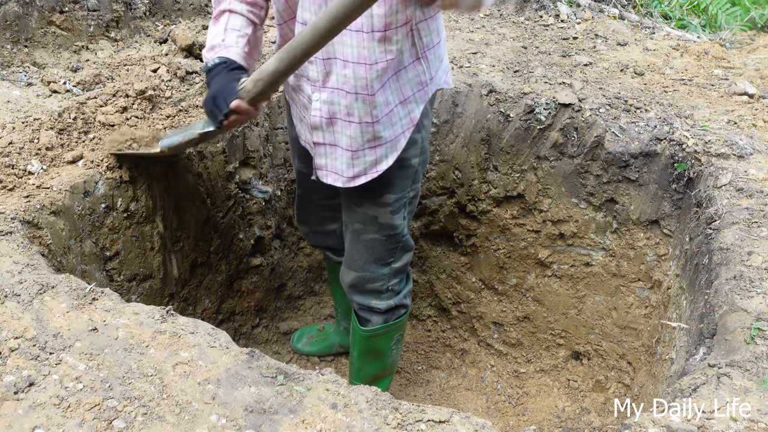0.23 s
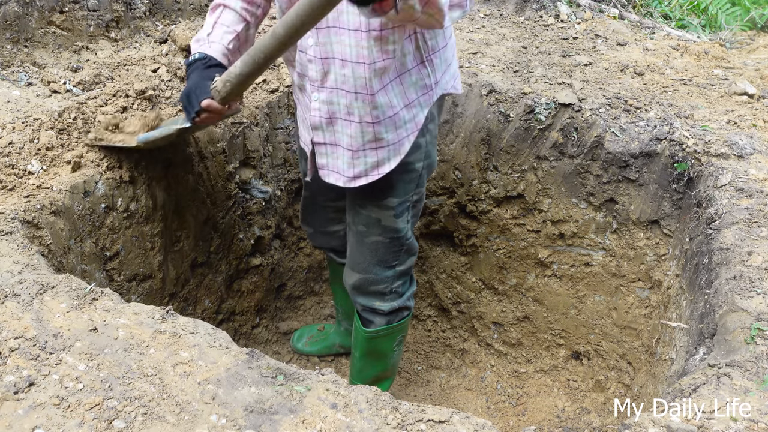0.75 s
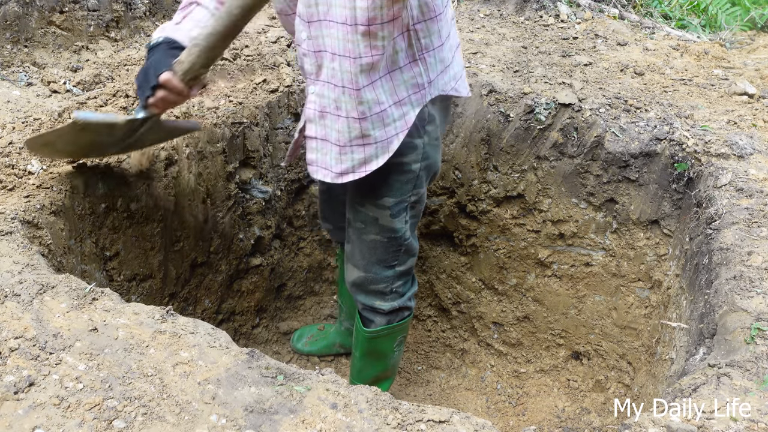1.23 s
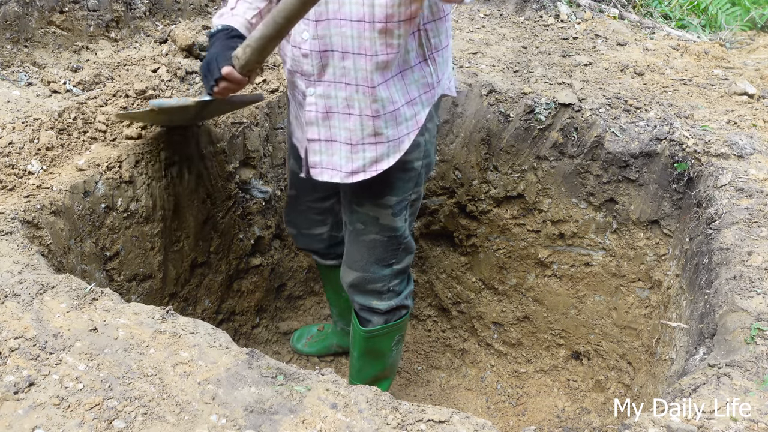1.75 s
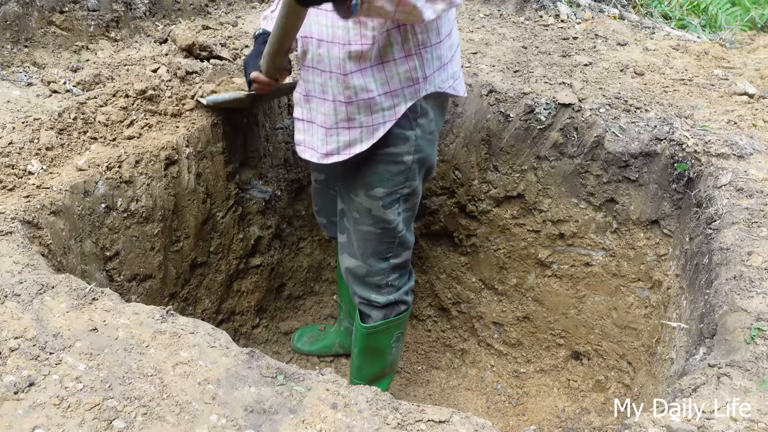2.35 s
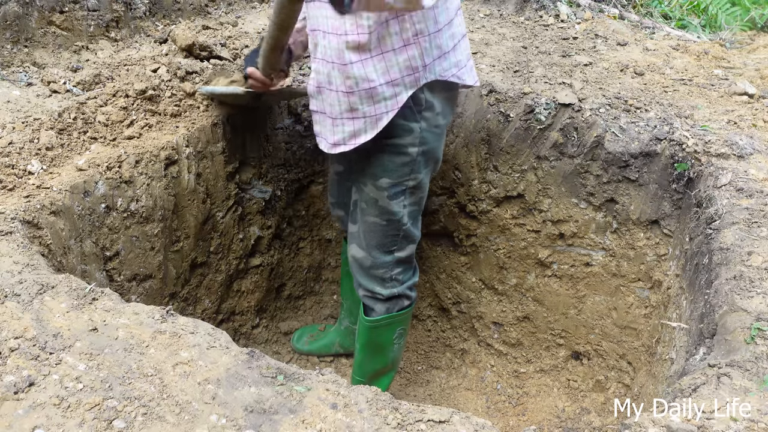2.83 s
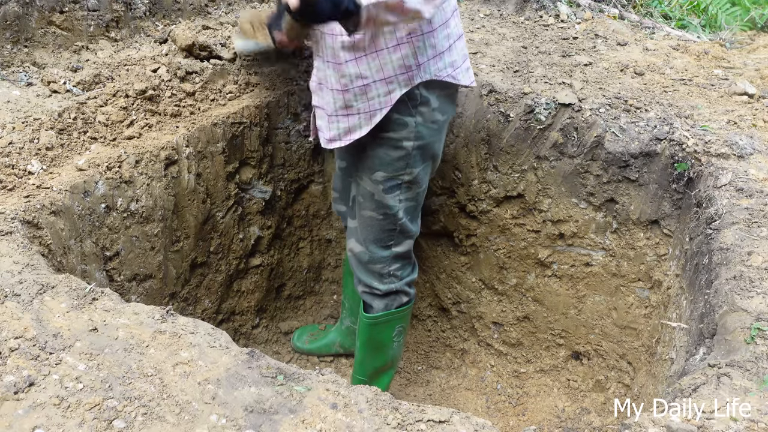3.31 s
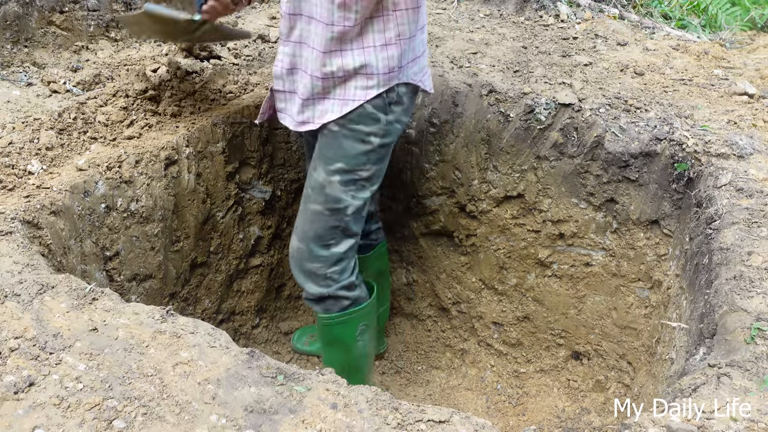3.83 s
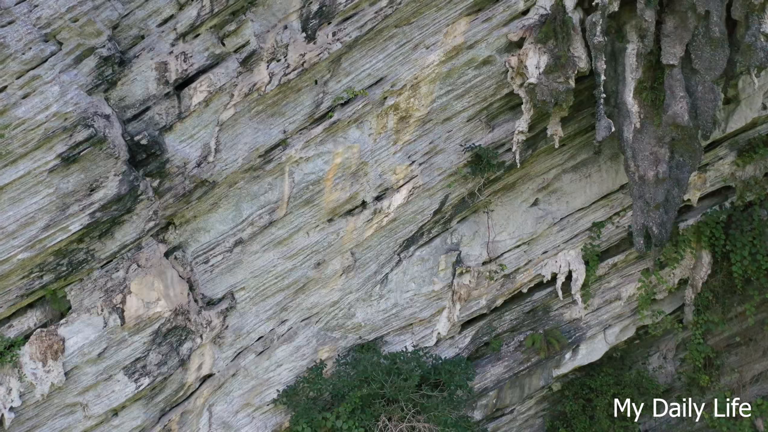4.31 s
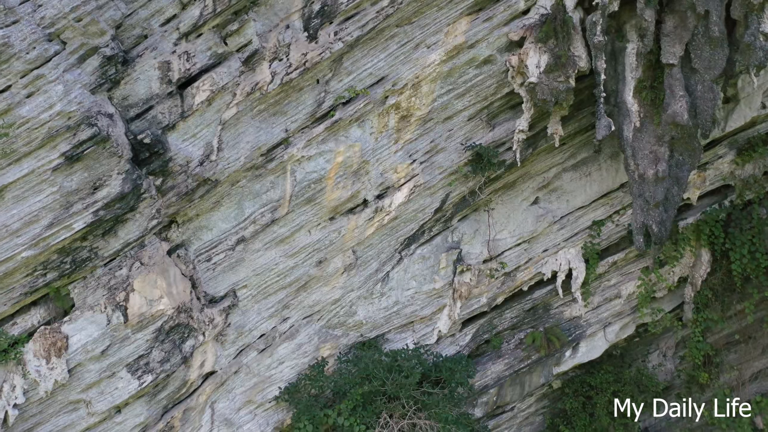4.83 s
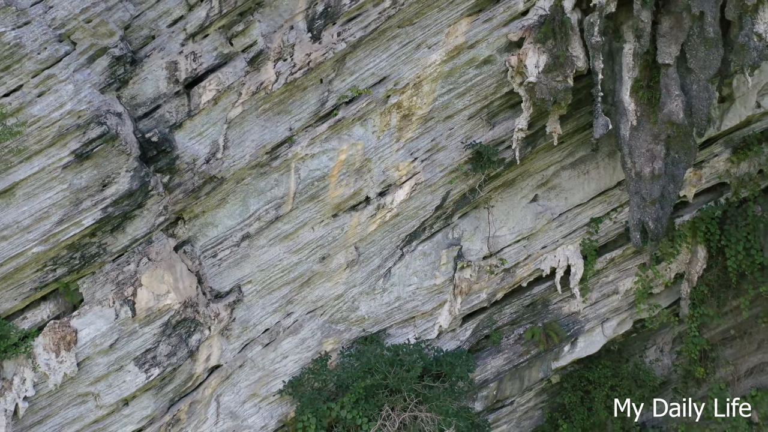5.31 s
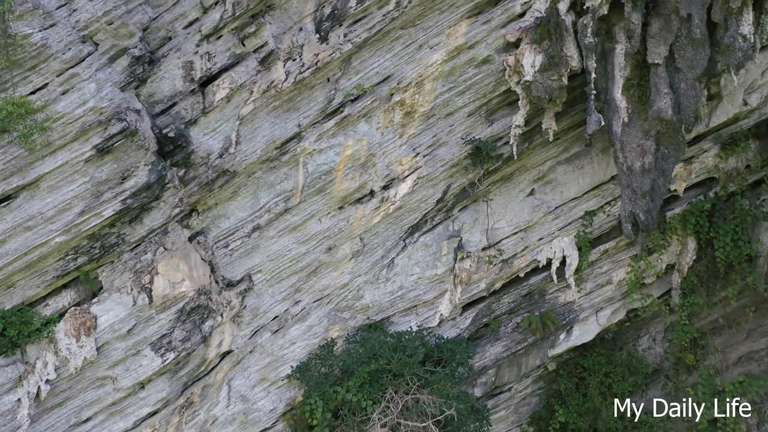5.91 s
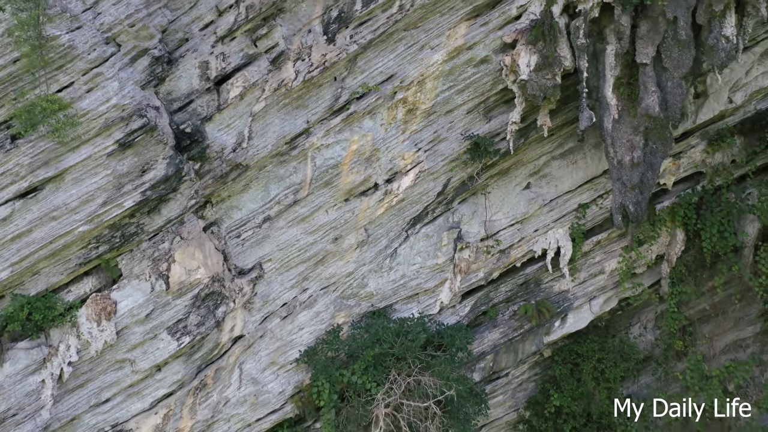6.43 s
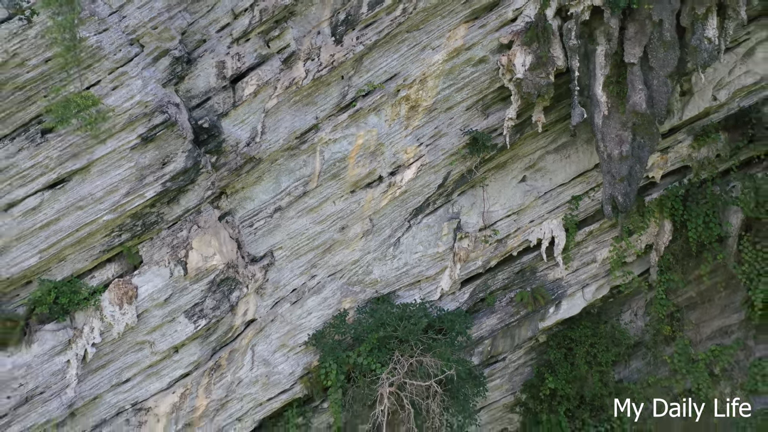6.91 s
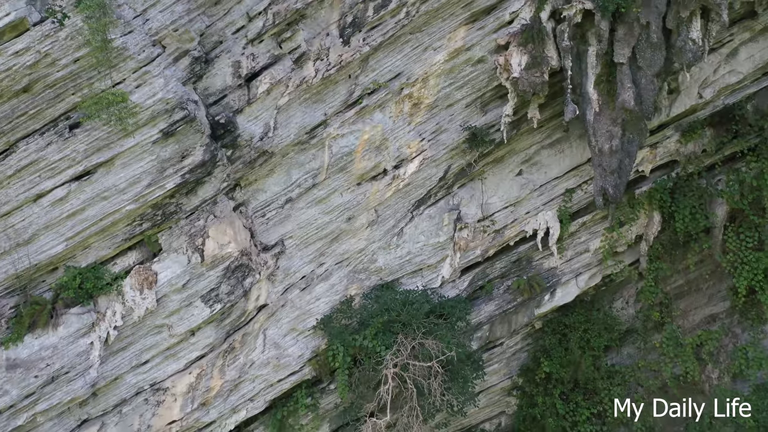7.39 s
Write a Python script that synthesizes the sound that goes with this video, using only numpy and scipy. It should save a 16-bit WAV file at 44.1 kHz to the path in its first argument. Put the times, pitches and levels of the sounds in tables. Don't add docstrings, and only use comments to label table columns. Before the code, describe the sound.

A close microphone catches a metal blade biting into gritty soil: two short scrapes, one long grinding scrape, a hard quick pair, then lighter rubs cleaning the blade. Pebbles click, steel rings shortly and lumps drop dully while high insects buzz all around. The sound then switches suddenly to calmer open air, with a fast high cricket trill, a fainter lower cricket to the left, distant rasps and small rising calls.

```python
import sys
import numpy as np
from scipy import signal
from scipy.fft import rfft, irfft, next_fast_len
from scipy.io import wavfile

SR = 44100
rng = np.random.default_rng(int(sys.argv[2]) if len(sys.argv) > 2 else 0)


def digitize_waveform(pressure):
    field = np.atleast_2d(pressure).T
    bounded = np.clip(field, -1, 1)
    quanta = np.round(bounded * 32767).astype(np.int16)
    wavfile.write(sys.argv[1], SR, quanta)


def boost(x):
    u = np.asarray(x, float) / 20
    return 10 ** u


N = 337806
T = np.arange(N) / SR
CUT_S = 4.063


def rms_one(x):
    return x / np.sqrt(np.mean(x ** 2) + 1e-20)


def in_time(rows):
    s, *columns = np.transpose(rows)
    return [np.interp(T, s, c) for c in columns]


def current_row(rows, lead_s=0):
    rows = np.array(rows)
    latest = np.searchsorted(rows[:, 0] - lead_s, T) - 1
    return rows[np.maximum(latest, 0)].T


def band(x, low_hz, high_hz, order=2):
    return signal.sosfilt(signal.butter(order, [low_hz, high_hz], "band", fs=SR, output="sos"), x)


def coloured(x, spectrum):
    size = next_fast_len(N)
    hz, level_db = np.transpose(spectrum)
    log_hz = np.log(np.fft.rfftfreq(size, 1 / SR) + 1)
    gain = boost(np.interp(log_hz, np.log(hz), level_db, left=-90))
    return rms_one(irfft(rfft(x, size) * gain, size)[..., :N])


def drift(rate):
    r = np.exp(-80 * np.pi * rate / SR)
    noise = rng.standard_normal(N // 40 + 2002)
    slow = signal.lfilter([1], [1, -2 * r, r * r], noise)[2000:]
    return np.interp(np.arange(N) / 40, np.arange(len(slow)), rms_one(slow))


def placed(x, pan_db):
    return x * boost(np.array([[pan_db / 2], [-pan_db / 2]]))


def wide(alike, pan_db):
    mid, side = rng.standard_normal((2, N))
    alike = np.clip(alike, 0, 1)
    both = np.sqrt((1 + alike) / 2) * mid
    apart = np.sqrt((1 - alike) / 2) * side * [[1], [-1]]
    return placed(both + apart, pan_db)


def tone(pitch_hz):
    return np.sin(2 * np.pi * np.cumsum(pitch_hz) / SR)


def bouts(rows, rise_s, fall_s, sag_db_per_s):
    out = np.zeros(N)
    for start_s, end_s, level_db in rows:
        at = slice(round(start_s * SR), round((end_s + fall_s) * SR))
        rise = np.clip((T[at] - start_s) / rise_s, 0, 1)
        fall = np.clip(1 + (end_s - T[at]) / fall_s, 0, 1)
        sag_db = sag_db_per_s * np.clip(T[at] - start_s - rise_s, 0, 1)
        out[at] += (rise * fall) ** 2 * boost(level_db - sag_db)
    return out


# (frequency [Hz], level [dB per Hz])
PIT_AIR = [(40, -36), (219, -18.5), (513, -25.5), (1500, -22), (1950, -23), (2200, -17), (3700, -12),
           (6260, -15), (7280, -6), (8670, -24), (9340, -22), (12500, -31.5), (15800, -24.5)]


def pit_air():
    return boost(-39.5 + drift(3.9)) * coloured(wide(0.58, 0.0), PIT_AIR)


# (frequency [Hz], level [dB per Hz])
CLIFF_AIR = [(40, -32), (90, -9), (200, 2), (550, 1), (900, -6), (1700, -2.5), (3000, -9), (6200, -9.5),
             (9800, -2.5), (10600, -18), (13000, -22), (14500, -14), (15800, -13)]


def cliff_air():
    return boost(-56 + 0.57 * drift(2.7)) * coloured(wide(0.59, 1.3), CLIFF_AIR)


# (low edge [Hz], high edge [Hz], level [dB], pulse rate [per s],
# pulse depth [0-1], left-right lean [dB], likeness of the ears [0-1])
PIT_CHORUS = [
    (7020, 7690, -36.5, 36, 0.07, -8.5, 1),
    (7970, 8400, -44, 200, 0, -5, 0.94),
    (8310, 8720, -46, 58, 0.4, 0.5, 0.9),
    (4540, 6400, -47, 340, 1, -8, 1),
]
CLIFF_CHORUS = [
    (6690, 7500, -49, 110, 0.099, -3, 1),
    (7550, 7880, -54.5, 50, 0.15, -1, 0.61),
    (5170, 5800, -58.5, 96, 0.3, -1, 0.62),
    (3980, 5650, -55.5, 300, 0.059, 4, 0.84),
    (8670, 9420, -60.5, 160, 0.12, -1, 0.75),
]


def chorus(table, heard):
    out = np.zeros((2, N))
    for low_hz, high_hz, level_db, per_s, depth, pan_db, alike in table:
        phase = 2 * np.pi * np.cumsum(per_s * (1 + 0.0395 * drift(3.96)[heard])) / SR
        pulses = (1 + np.clip(depth, 0, 1) * np.cos(phase)) ** 2 * boost(drift(2.4)[heard])
        wings = band(wide(alike, pan_db)[:, heard] * pulses, low_hz, high_hz, order=3)
        out[:, heard] += boost(level_db) * rms_one(wings)
    return out


# (start [s], end [s], pitch [Hz], level [dB])
WHINES = [(0.042, 0.232, 3650, -36), (0.627, .72, 3700, -37), (0.903, 1.338, 3607, -36.5),
          (.98, 1.144, 5500, -35.5), (1.699, 2.06, 5170, -39), (1.791, 2.013, 3760, -37),
          (2.358, 2.665, 5070, -36.5), (2.359, 2.672, 5260, -35.5), (2.4, 2.617, 5570, -38),
          (2.95, 3.496, 5560, -38), (3.194, 3.75, 5080, -39), (3.293, 3.499, 4400, -58),
          (3.302, 3.603, 2880, -44.5), (3.44, 3.693, 3830, -41)]


def whines():
    out = np.zeros(N)
    swell_db = 1.6 * drift(9) + 2.6 * drift(70) - .5
    waver_hz = 14 * drift(40)
    for start_s, end_s, hz, level_db in WHINES:
        at = np.arange(round(start_s * SR), round(end_s * SR))
        own = (at + round(hz * 50)) % N
        fade = np.clip(np.minimum(T[at] - start_s + 0.0081, end_s - T[at]) / 0.015, 0, 1)
        out[at] += fade * boost(level_db - 8.0 + swell_db[own]) * tone(hz + waver_hz[own])
    return placed(out, -3.0)


# (start [s], end [s], level [dB], first pitch [Hz])
TRILL = [(4.062, 4.117, -50, 3350), (4.115, 4.15, -61, 3210), (4.16, 4.19, -65, 3200),
         (4.29, 4.32, -63, 3250), (4.38, 4.42, -65, 3330), (5.4, 5.44, -52, 3350), (5.44, 5.49, -52, 3320),
         (5.495, 5.55, -62, 3290), (5.574, 5.627, -49.5, 3370), (5.635, 5.665, -57, 3280),
         (5.68, 5.71, -63, 3340), (5.72, 5.78, -61, 3340), (5.8, 5.843, -63, 3350)]


def far_trill():
    strength = bouts(np.array(TRILL)[:, :-1], rise_s=0.02, fall_s=0.075, sag_db_per_s=110.0)
    start_s, end_s, level_db, first_hz = current_row(TRILL)
    pitch = first_hz - 1300 * np.clip(T - start_s, 0, .1)
    return placed(strength * boost(2.8 * drift(110) - 2) * tone(pitch + 40 * drift(90)), 7.6)


# (pitch [Hz], pulse rate [per s], left-right lean [dB], lateness [throbs])
SHIMMER_WINGS = [
    (5330, 110, -3, .45),
    (5480, 100, 6, 0.1),
    (5630, 86, 6, 0.0),
]


def mid_singers():
    depth, peak_s, period_s = 0.85, 4.19, .1344
    shimmer = 0
    for hz, per_s, pan_db, late in SHIMMER_WINGS:
        pulses = (1 + np.cos(2 * np.pi * np.cumsum(per_s + 2.7 * drift(3.23)) / SR)) ** 0.87
        throb = 1 + depth * np.cos(2 * np.pi * ((T - peak_s) / period_s - late))
        song = throb * pulses * boost(1.2 * drift(5.9)) * tone(hz + 60 * drift(40.3))
        shimmer = shimmer + placed(song, pan_db)
    return rms_one(shimmer) * boost(-53.5)


# (start [s], end [s], level [dB])
RASP = [
    (4.53, 4.9, -60),
    (4.95, 5.3, -59.5),
    (5.36, 5.8, -61.5),
    (6.33, 6.4, -70),
    (6.62, 6.95, -63),
    (7.05, 7.17, -65),
]


def rasp():
    scratches = (1 + .4 * np.cos(2 * np.pi * np.cumsum(84 + 6 * drift(8)) / SR)) * boost(drift(30))
    dry_noise = rms_one(band(wide(.85, 0.0) * scratches, 9300, 12800))
    return dry_noise * bouts(RASP, rise_s=0.072, fall_s=0.33, sag_db_per_s=20.0)


# (start [s], end [s], level [dB])
GLIDES = [
    (6.383, 6.45, -54),
    (6.685, 6.75, -52),
    (6.93, 7.0, -52),
    (7.14, 7.21, -50),
    (7.34, 7.42, -50),
    (7.54, 7.61, -49),
]


def glides():
    since = np.clip(T - current_row(GLIDES)[0], 0, .08)
    call = tone(4520 + 4000 * since + 190 * drift(200))
    return bouts(GLIDES, rise_s=.02, fall_s=.02, sag_db_per_s=0) * boost(-4 + 3.5 * drift(70)) * call


def wing_note(t, hz, arch_hz, fall_hz, length_s, rough_db):
    u = np.clip(2 * t / length_s, -1, 1)
    pitch = hz - arch_hz * u ** 2 - fall_hz * u + 15 * rough_db * drift(80.5)
    return (1 - u ** 6) * boost(rough_db * drift(220)) * tone(pitch)


# (time [s], level [dB])
HIGH_CRICKET = [
    (4.07, -46.5),
    (4.6, -47.5),
    (5.1, -46),
    (5.4, -47.5),
    (5.7, -45.5),
    (6.0, -47),
    (6.4, -45.5),
    (7.2, -47.5),
]


def high_cricket():
    first_s, period_s, last_s = 4.1017, .044124, 7.30
    since = (T - first_s + period_s / 2) % period_s - period_s / 2
    tiring_db = -9 * (T > last_s) - 40 * (T > last_s + .09)
    level_db = in_time(HIGH_CRICKET)[0] + 10.5 - 85 * since + tiring_db
    high = wing_note(since - .001, 7270, 260, 30.0, .017, rough_db=0.8) * boost(level_db)
    return placed(np.array([high, np.roll(high, 1)]), -3)


# (time [s], level [dB])
LOW_CRICKET = [
    (4.07, -58.5),
    (4.57, -56.5),
    (4.63, -76),
    (4.78, -70),
    (4.81, -57),
    (5.3, -57.5),
    (7.66, -56.5),
]
# (start [s], period [s])
LOW_PHRASES = [
    (3.952, .0445),
    (4.835, .072),
    (5.045, .06),
    (5.225, .0445),
    (5.581, .04305),
    (6.442, .0436),
]


def low_cricket():
    start_s, period_s = current_row(LOW_PHRASES, lead_s=.02)
    since = (T - start_s + period_s / 2) % period_s - period_s / 2
    flat_hz = 6000 * (period_s - period_s.min())
    second = wing_note(since - .003, 4185 - flat_hz, 55, 270, 0.014, rough_db=1.7)
    first = wing_note(since + 0.01, 4175 - flat_hz, 60, 230, .011, rough_db=3.0)
    chirps = second + boost(-2.0) * first
    return placed(chirps * boost(in_time(LOW_CRICKET)[0] + 1.5), 18.3)


# (time [s], peak level [dB], pitch [Hz])
CLODS = [(1.368, -28.5, 520), (1.432, -26.5, 804), (1.47, -25.5, 700), (1.57, -17, 856), (2.516, -41, 495),
         (2.568, -28, 456), (2.594, -36, 560), (2.62, -45, 450), (2.645, -39, 420), (2.66, -40, 484),
         (2.935, -37, 350), (3.212, -28, 1000), (3.222, -26, 1100), (3.236, -22, 706), (3.868, -44.5, 250),
         (6.728, -51, 520)]


def clods():
    out, t = np.zeros(N), np.arange(int(.08 * SR)) / SR
    for s, peak_db, hz in CLODS:
        crumble = rng.standard_normal(len(t)) * boost(-60 * t / 0.062)
        impact = 14 * (t == 0)
        burst = band(crumble + impact, hz / 1.8, hz * 1.6)
        out[round(s * SR):][:len(t)] += boost(peak_db + 0.5) * burst / np.abs(burst).max()
    return out


def ground_echo(x):
    dull = band(x + 1e-18, 150, 21000, order=1) * boost(-12.5)
    out = np.array([x, x])
    for ear, lag_s, level_db in [(0, 0.00272, -65), (0, 0.0051, -9.0), (0, .0093, -0.5), (0, 0.011, -14)]:
        lag = round(lag_s * SR)
        out[ear, lag:] += boost(level_db) * dull[:N - lag]
    return out


def grit(per_s, spread_db):
    sizes = boost(spread_db * np.minimum(rng.exponential(1, N), 5)) * rng.choice([-1, 1], N)
    return rms_one(sizes * (rng.random(N) < per_s / SR))


def resonance(x, hz, width_hz):
    r, w = np.exp(-np.pi * width_hz / SR), 2 * np.pi * hz / SR
    return signal.lfilter([0, 2 * np.sqrt(1 - r) * np.sin(w)], [1, -2 * r * np.cos(w), r * r], x)


# (deepest point [s], sinking [ms], freeing [ms], rub level [dB], weight [dB])
STROKES = [
    (-.1, 100, 123, -20, -13),
    (0.319, 25, 120, -16, 0.5),
    (0.819, 93.6, 200, -18.5, -0.5),
    (1.6, 236, 74, -17, -5.5),
    (2.179, 54.5, 97, -15.5, -5.5),
    (2.299, 33, 146, -19.5, 0),
    (2.861, 140, 190, -28, -3),
    (2.939, 42, 140, -23, 1.5),
    (3.18, 180, 115, -28, 1),
]


def strokes():
    levels = []
    for deepest_s, sink_ms, free_ms, rub_db, weight_db in STROKES:
        sink_s, free_s = sink_ms / 1000, free_ms / 1000
        moments = deepest_s + np.array([-sink_s - .025, -sink_s, 0, free_s, free_s + 1])
        trickle_db = rub_db - 16
        levels.append(np.interp(T, moments, [-75, rub_db - 6.5, rub_db, trickle_db, trickle_db - 34]))
    levels = np.array(levels)
    return levels.max(axis=0), np.array(STROKES)[levels.argmax(axis=0), -1]


# (time
# [s], peak level [dB], dull share [dB], bright share [dB], blade pitch [Hz])
CATCHES = [(0.2782, -17, -29, 1, 3260), (0.2997, -5.5, -15, -5, 3340), (0.3182, -12.5, -5, -19, 4390.0),
           (0.3384, -6.5, -11.5, -7, 3790), (0.3648, -11, -10, -9, 3310), (0.3815, -17, -18, -9.0, 3030),
           (0.3915, -16, -17, -5, 3370.0), (0.4024, -17, -8, -11.0, 3980.0), (0.7324, -32, -10.0, -9, 3500),
           (0.743, -19, -3, -17, 2820), (0.7727, -12, -9, -15, 3740), (0.7869, -4, -3, -10, 3840),
           (0.8073, -7.5, -10, -18, 3090), (0.8264, -9.5, -5, -21, 2950),
           (0.8562, -24, -10.0, -7.0, 3940.0), (0.8651, -18.5, -5, 2.5, 6040), (0.8879, -15, -6, -5, 3200),
           (1.3632, -13, -8, 0, 4200), (1.3947, -12.5, -13.0, -4, 4430),
                (1.4245, -5.5, -10.5, -2, 3580), (1.4354, -6, -4, -11.0, 4200), (1.471, -14, -4, 0, 2140),
                (1.4833, -15, -9, -12, 3780), (1.4884, -14, -8, -10.0, 1950), (1.5252, -12, -19, 0, 3780.0),
                (1.5444, -16, -15, 7, 4120.0), (1.5588, -9.5, -1, 3.5, 3920.0),
                (1.5684, -7.5, -3, -1.5, 1970.0), (1.599, -6.5, -5, -10, 4400),
                (1.615, -9.5, -5, -2.5, 4270), (2.125, -17, -21, 7.5, 3860),
                (2.1365, -10.5, -18, 4.5, 2560.0), (2.151, -10.5, -6.0, -8, 2080),
                (2.16, -8.5, -2, -5.0, 5100), (2.1843, -9.5, -5, -6, 4200), (2.227, -8.5, -11, -23, 3110),
                (2.256, -20.0, -10, -4, 3870), (2.272, -17, -9, 3, 3730), (2.29, -10.5, -7, -2, 2210),
                (2.3007, -11, -8, -11.0, 3090.0), (2.3277, -22, -20, -4, 5050)]
KNOCKS = [(0.0168, -24, -26, -18, 3880), (0.2419, -23.5, -16, -5, 2210), (0.4998, -19, -17, -18, 4150),
          (0.5173, -20, -18, -15.0, 3340), (0.9355, -24.5, 6.5, -15.0, 3040), (1.1027, -27, -7, 5.5, 3620),
          (1.1584, -45, -15, -9.0, 3700), (1.6725, -29, -6.0, -9.0, 2090.0), (1.7019, -26, -1, -13.0, 3050),
          (1.8177, -22, -13, 1, 2170), (2.0604, -21.5, -33, -4, 2790.0),
          (2.3568, -24, -13.0, -13.0, 3900.0), (2.3703, -18, -11.0, -6, 3270),
          (2.3779, -20.0, -9, -5, 2260), (2.396, -23, -8, -1, 2530), (2.4278, -27, -13.0, -14.0, 4960),
          (2.4973, -31, -2, -16, 5170), (2.5633, -30, -16, -13.0, 3850), (2.589, -31, 1, -12.0, 1900),
          (2.6896, -20, -2, 3, 3200), (2.701, -20, -8, -11.0, 5370), (2.736, -21.5, -11, 1, 4100),
            (2.7489, -31, -13, -8.0, 3200), (2.7705, -13.5, -9, 4.5, 5970), (2.797, -15.5, -15, 3, 5520),
            (2.83, -11.5, -6, 2.5, 5600), (2.8453, -19, -4.0, 0, 2150), (2.87, -17, -4, -2, 5470.0),
            (2.9279, -5.5, -8, -15, 4440), (2.9383, -14.5, -8, -10.0, 2120), (2.9519, -9, -10, -5, 4070),
            (2.9886, -18.5, -6, -13.0, 3070), (3.0264, -34, -16, -10.0, 5580.0),
            (3.0331, -33, -14.0, -10.0, 5560), (3.049, -21.5, -11, -10.0, 4410.0),
            (3.0693, -21, -5, -2, 3030), (3.1083, -34, -11.0, -6, 4400), (3.1335, -23, -10, -11.0, 4380),
            (3.1463, -21, -2, 1, 2980), (3.1782, -28, 3, -9.0, 5040.0), (3.218, -13.5, 0, -7, 3580),
            (3.231, -29, 5, -9.0, 2190), (3.2424, -40, -6, -12.0, 2190.0), (3.264, -38, -13, -10.0, 5010.0),
            (3.275, -21, -5, -11.0, 2570), (3.2875, -18, -9, -21, 3070)]


def jolts(grains):
    body, dull, bright, notes = np.zeros((4, N))
    t = np.arange(int(.15 * SR)) / SR
    for rows, t60 in [(CATCHES, 0.056), (KNOCKS, 0.048)]:
        for s, peak_db, dull_db, bright_db, hz in rows:
            at = slice(round(s * SR), round(s * SR) + len(t))
            rise_s = .0002 * max(-peak_db - 5, 2)
            tail = boost(peak_db - 60 * t / t60)
            tick = boost(peak_db - 16.0 - 60 * t / 0.0019)
            shape = (tail + tick) * np.minimum(t / rise_s, 1)
            body[at] += shape
            dull[at] += boost(peak_db + dull_db - 60 * t / t60 / 1.53) * np.minimum(t / 0.0032, 1)
            bright[at] += shape * boost(bright_db)
            ring_db = -15.5 + (0.74 - 1) * (peak_db - 2.5)
            notes[at] += boost(ring_db) * resonance(grains[at] * shape, hz, 150)
    return body, dull, bright, notes


# (time [s], peak level [dB])
TICKS = [(.3013, -6), (.3181, -8), (.344, -9), (.3685, -12), (.787, -9), (.809, -6), (1.3635, -13),
         (1.3955, -15), (1.4254, -6), (1.4275, -7), (1.438, -7), (1.5247, -3.5), (1.5695, -5), (1.6005, -6),
         (2.0615, -20), (2.128, -11), (2.138, -5), (2.1705, -6), (2.186, -8), (2.2266, -5), (2.2925, -11),
         (2.7677, -18), (2.772, -15), (2.83, -14), (2.9296, -4), (2.934, -10), (3.05, -24), (3.2205, -17),
         (3.2885, -16)]


def ticks():
    clicks, t = np.full(N, 1e-18), np.arange(round(.03 * SR)) / SR
    for s, peak_db in TICKS:
        force_db = peak_db + 10
        spray = boost(force_db - 16 - 60 * t / .03) * rng.standard_normal(len(t))
        clicks[round(s * SR):][:len(t)] += spray
        clicks[round(s * SR)] += boost(force_db)
    return band(clicks, 2450, 8000)


# (time [s], pitch [Hz], peak level [dB], fall by 60 dB [s])
RINGS = [(.3, 908, -31, 0.08), (.345, 1420, -21.5, 0.17), (.362, 1417, -26.5, .2),
         (.405, 1134, -22.5, 0.077), (.75, 1400, -35, 0.36), (.8, 1130, -28, .12), (.885, 1123, -29, 0.11),
         (.9, 1435, -33, 0.26), (1.01, 1438, -45.5, 0.55), (1.055, 1146, -36, 0.061),
         (1.365, 1110, -24.5, 0.16), (1.43, 1052, -22.5, 0.16), (1.445, 2090, -18.5, 0.11),
         (1.485, 1945, -28, 0.24), (1.572, 2000, -13.5, 0.052), (1.6, 1380, -30, 0.057),
         (1.606, 1330, -33, 0.58), (2.159, 920, -37, 0.12), (2.295, 902, -24, 0.17),
         (2.695, 890, -38, 0.11), (2.8, 1350, -32, 0.11), (2.832, 1380, -27, 0.13),
         (2.865, 915, -33.5, 0.24), (2.951, 1343, -35, 0.24), (3.291, 1420, -25.5, 0.078)]


def rings():
    out, t = np.zeros(N), np.arange(round(.5 * SR)) / SR
    for s, hz, peak_db, t60 in RINGS:
        swell = np.minimum(t / 0.0062, 1)
        out[round(s * SR):][:len(t)] += boost(peak_db - 60 * t / t60) * swell * np.sin(2 * np.pi * hz * t)
    return out * boost(5 * drift(110) - 3)


DIGGING = slice(0, N // 2)
DULL_BELOW_HZ = 2200
# (frequency [Hz], level [dB per Hz])
CLAY = [(410, -40), (700, -70), (897, -14.5), (1400, -7), (1530, -3), (2180, -2), (2380, -3), (3020, 3),
        (4700, 1), (8670, -7.5), (15800, -27.5)]
CRUNCH_EDGES_HZ = [420, 700, 1100, 1600, 2200, 3000, 4000, 5200, 6800, 8800, 11000]


def crunch(force, dull_force):
    out, share = np.zeros(N), .75
    crackle = share * grit(1800, spread_db=3.0)
    clay = []
    for _ in range(2):
        own = (1 - share ** 2) ** .5 * grit(5000, spread_db=2.5)
        clay.append(coloured(crackle + own, CLAY)[DIGGING])
    for k, (low_hz, high_hz) in enumerate(zip(CRUNCH_EDGES_HZ, CRUNCH_EDGES_HZ[1:])):
        drive = dull_force if low_hz < DULL_BELOW_HZ else force
        patchy = drive * boost(drift(46) - 2.0)
        out[DIGGING] += band(clay[k % 2], low_hz, high_hz) * patchy[DIGGING]
    return out


# (pitch [Hz], width [Hz], level [dB])
BLADE = [(930, 6.8, -11), (1140, 8.5, -8), (1316, 4.3, -5.5), (1420, 3.1, -2.5), (1937, 20, -4.5),
         (2135, 18, -0.5), (2283, 37, -3.5), (2560, 21, -4), (2672, 40, -3), (3090, 24, -1),
         (3310, 18, -6.5), (3808, 21, 0), (4110, 42, -3), (4420, 12, -3.5), (4900, 13, -5.5),
         (6300, 55, -34)]


def blade_modes(force, dull_force):
    out, grains = np.zeros(N), grit(4000, spread_db=2.0)
    for hz, width_hz, level_db in BLADE:
        low = hz < DULL_BELOW_HZ
        drive = grains * (dull_force * boost(-6.5) if low else force) * boost(3.42 * drift(25))
        out[DIGGING] += boost(level_db - 16) * resonance(drive[DIGGING], hz, width_hz + 10 + 16 * low)
    return out


# (frequency [Hz], level [dB per Hz])
PUSH = [(76, -51), (130, -3), (257, 16), (335, 6.5), (591, -13), (900, -18), (1170, -22), (1980, -120)]


def shovel():
    rub_db, weight_db = strokes()
    fine_db = -27 + 1.29 * (rub_db + 21.0)
    push_db = -43 + 1.8 * (rub_db + 19.5) + weight_db
    thump_db = -57 + (rub_db + 21.0) + weight_db
    body, dull, bright, notes = jolts(grit(9000, spread_db=5.0))
    clumps_db = 2.8 * drift(90)
    force = np.hypot(boost(rub_db - 3.0 + clumps_db), boost(-4.0) * body)
    dull_force = np.hypot(boost(rub_db - 5 + clumps_db), boost(3.0) * dull)
    blade = crunch(force, dull_force) + blade_modes(force, dull_force)
    dust = rms_one(band(coloured(grit(16000, spread_db=4.0), CLAY), 8740, 16000))
    fine = dust * np.hypot(boost(fine_db - 2.5 + clumps_db), boost(-8.0) * bright)
    push = coloured(rng.standard_normal(N), PUSH) * boost(push_db - 1.5)
    thump = rms_one(band(rng.standard_normal(N), 82, 127)) * boost(thump_db - 1.0)
    edge = band(blade + fine, 500, 18000)
    return edge + push + thump + notes + ticks() + rings()


def scene():
    digging = ground_echo(shovel() * (T < 3.45) + clods())
    pit = pit_air() + chorus(PIT_CHORUS, slice(0, round(4.1 * SR))) + whines() + digging
    cliff = cliff_air() + chorus(CLIFF_CHORUS, slice(4 * SR, N))
    cliff = cliff + far_trill() + mid_singers() + rasp() + glides()
    cliff = cliff + high_cricket() + low_cricket() + digging
    return np.where(T < CUT_S, pit, cliff * np.clip((T - CUT_S) / 0.027, .1, 1))


def top_cut(x):
    return signal.sosfilt(signal.butter(12, 16010, fs=SR, output="sos"), x)


def record(dry):
    rounded = 0.93 * np.tanh(dry / 0.98)
    thin = signal.sosfilt(signal.butter(6, 62, "high", fs=SR, output="sos"), rounded)
    mix = signal.sosfilt(signal.cheby2(14, 55, 16250, fs=SR, output="sos"), thin)
    return top_cut(mix)


dry = scene()
out = record(dry)
digitize_waveform(out)
```